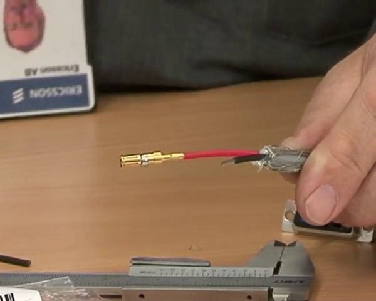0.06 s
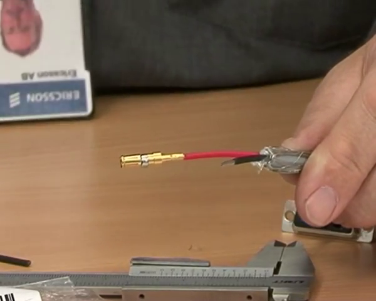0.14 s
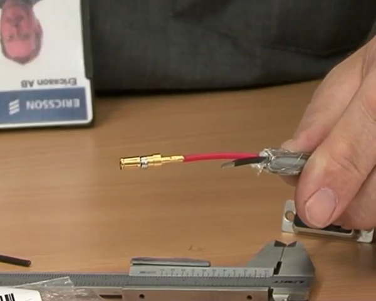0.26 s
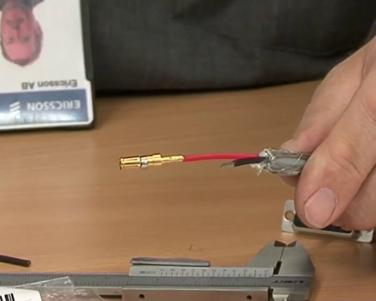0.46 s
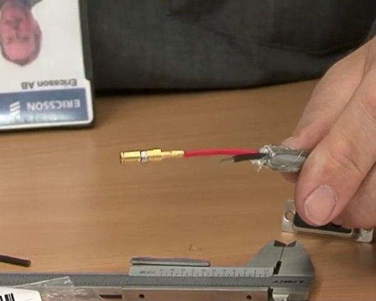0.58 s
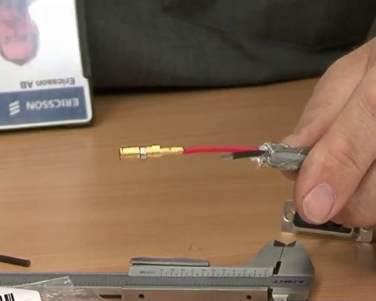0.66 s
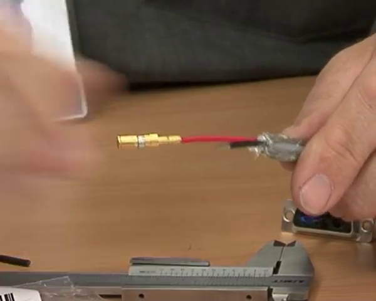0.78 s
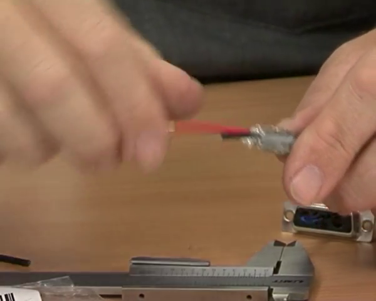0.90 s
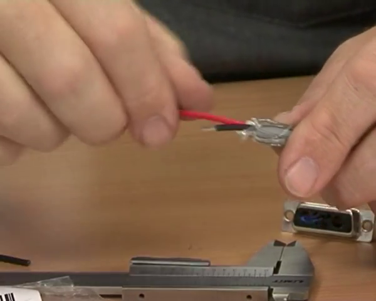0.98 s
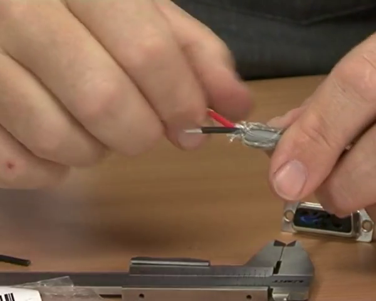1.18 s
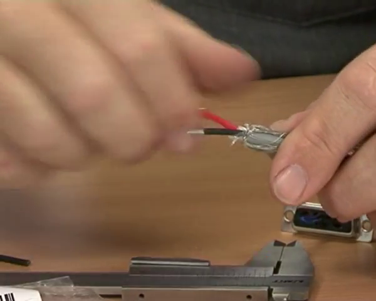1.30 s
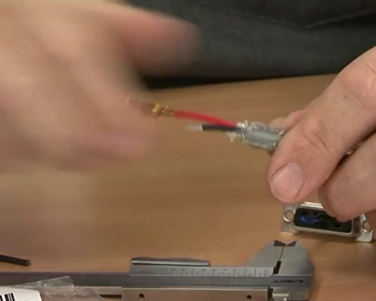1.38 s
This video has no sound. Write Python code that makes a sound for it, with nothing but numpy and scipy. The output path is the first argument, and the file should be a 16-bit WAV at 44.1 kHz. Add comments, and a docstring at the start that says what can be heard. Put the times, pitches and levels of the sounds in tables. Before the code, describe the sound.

Close up in a small room, a metal hand tool thuds and clacks twice onto a wooden work table, which booms as the steel faintly rings. Light ticks and a soft sleeve rub follow over a low hum.

```python
"""A dull thud and two hard clacks: a steel crimping tool is put down on a wooden work table in a small room.
Each landing rings the table top, which booms; the jolted, loose steel jaws rattle and ring faintly.
Then a sleeve slides over the table in tiny slips of cloth as the hand comes back to the wire.
Small handling ticks and a dull shuffle sound over the room's hum."""
import sys
import numpy as np
from scipy import signal
from scipy.fft import rfft, irfft
from scipy.io import wavfile

SR = 44100
rng = np.random.default_rng(int(sys.argv[2]) if len(sys.argv) > 2 else 0)


def wav_out(sig):
    """Save sig, one row per channel (or a flat mono array), as 16-bit PCM at SR to the path in sys.argv[1]."""
    wavfile.write(sys.argv[1], SR, np.round(np.clip(np.atleast_2d(sig).T, -1, 1) * 32767).astype(np.int16))


N = 63945
T = np.arange(N) / SR
AGE = T[:N // 2]  # seconds since a contact

# Each row: start in seconds, top level in dB, contact brightness in Hz, pitch the spot favours in Hz,
# its boost in dB, crack level in dB, sway level in dB, boom level in dB.
LANDINGS = [(0.2386, -4, 680, 481, 16.5, -34.5, -39, -17), (0.28, -1, 3830, 310, 2.5, -19.5, -28.5, -21.5),
            (0.5106, -0.5, 2220, 920, 3.5, -21, -22.5, -18.5)]
SPOT_WIDTH_OCT, CRACK_T60_S, CRACK_LOW_HZ = 0.39, 0.0087, 1460

def knocks():
    """Each landing rings the top, cracks at the contact and makes the whole table sway and boom."""
    sway, boom = ring(hz=55.5, t60=0.44), ring(hz=92, t60=0.23)
    out = 0
    for start, db, bright_hz, spot_hz, spot_db, crack_db, sway_db, boom_db in LANDINGS:
        def spot_gain(hz):
            return from_db(spot_db * np.exp(-(np.log2(hz / spot_hz) / SPOT_WIDTH_OCT) ** 2))
        top = from_db(db) * table_top(bright_hz, spot_gain)
        crack = from_db(crack_db) * cut(burst(CRACK_T60_S), CRACK_LOW_HZ, "high")
        out += place(start, top + crack + from_db(sway_db) * sway - from_db(boom_db) * boom)
    return out


# Each row: frequency in Hz, relative level in dB, T60 in seconds.
TOP_MODES = [(140.5, -16, 0.085), (204.5, -19, 0.091), (249, -22, 0.13), (314.4, -9.5, 0.079),
             (454, -10, 0.044), (600, -10, 0.036), (812.4, -5.5, 0.032), (994, -8.5, 0.015),
             (1217, -11.5, 0.023), (1650, -19, 0.019), (1886, -15.5, 0.025), (2325, -15, 0.017),
             (2685, -18.5, 0.017), (3400, -26.5, 0.0087), (5500, -21, 0.027)]

def table_top(bright_hz, mode_gain):
    """The struck wood rings; a soft contact starts gently and weakens the high modes."""
    modes = 0
    for k, (hz, db, t60) in enumerate(TOP_MODES):
        rolloff = np.hypot(1, (hz / bright_hz) ** 2)
        modes += (-1) ** k * from_db(db) * mode_gain(hz) / rolloff * ring(hz, t60)
    attack = np.tanh(2 * np.pi * bright_hz * AGE)
    return modes * attack


# Each row: start in seconds, level in dB.
HEAD_HITS = [(0.2803, -27), (0.5116, -20.5)]
# Each row: frequency in Hz, relative level in dB, T60 in seconds.
DAMPED_HEAD_MODES = [(1642, 0, 0.039), (4060, -2.5, 0.015), (5630, -4, 0.017), (11400, -7, 0.0088)]

def head_snaps():
    """The steel head, damped by the hand, snaps briefly where it lands hard."""
    head = sum(from_db(db) * ring(hz, t60) for hz, db, t60 in DAMPED_HEAD_MODES)
    return sum(place(start, from_db(db) * head) for start, db in HEAD_HITS)


# Each row: start in seconds, level in dB.
JAW_JOLTS = [(0.2412, -7), (0.2543, -0.5), (0.2912, -5.5), (0.5205, -6), (0.532, -1)]
# Each row: frequency in Hz, relative level in dB, T60 in seconds.
JAW_MODES = [(3009, -44.5, 0.28), (3420, -48, 0.45), (3955, -59, .22), (5346, -47.5, 0.46),
             (6345, -43, 0.22), (6826, -45, 0.28), (6867, -37.5, 0.22), (10235, -45.5, 0.21)]
RATTLE_DB, RATTLE_T60_S, JOLT_RISE_S = -23, 0.11, 0.0045
CHATTER_DEPTH, CHATTER_HZ = 0.55, 60

def jaws():
    """Jolted just after a landing, the loose steel jaws rattle and ring on, wavering."""
    rise = np.clip(AGE / JOLT_RISE_S, 0, 1)
    out = 0
    for start, db in JAW_JOLTS:
        rattle = from_db(RATTLE_DB) * cut(burst(RATTLE_T60_S), [1400, 5000], "band")
        tone = 0
        for hz, mode_db, t60 in JAW_MODES:
            chatter = 1 + CHATTER_DEPTH * waver(CHATTER_HZ, size=len(AGE))
            tone += from_db(mode_db) * ring(hz, t60) * chatter
        out += place(start, from_db(db) * rise * (rattle + tone))
    return out


# Each row: start in seconds, level in dB, contact brightness in Hz, bass roll-off in Hz.
HANDLING_TAPS = [(0.012, -12, 254, 75.6), (0.086, -30, 590, 202), (0.184, -31.5, 1200, 250),
                 (0.2459, -4, 1240, 603), (0.2615, -14, 1320, 152), (0.303, -42, 2500, 200),
                 (0.322, -32, 447, 150), (0.411, -28, 8300, 3500), (0.466, -22.5, 2960, 1000),
                 (0.483, -20.5, 4940, 2020), (0.5055, -10, 282, 59), (0.826, -25.5, 3020, 1410),
                 (0.836, -24.5, 2950, 1530), (0.863, -28, 7000, 3020), (1.345, -22, 2210, 1320),
                 (1.444, -20, 487, 97)]

def taps():
    """Small bumps and ticks on the same top; light touches move little bass."""
    out = 0
    for start, db, bright_hz, low_hz in HANDLING_TAPS:
        top = table_top(bright_hz, lambda hz: 1 / np.hypot(1, (low_hz / hz) ** 2))
        out += place(start, from_db(db) * top)
    return out


# Each row: time in seconds, relative level in dB.
RUB_ENVELOPE = [(0.94, -63), (1.005, -43.5), (1.08, -39.5), (1.125, -42), (1.16, -39.5), (1.19, -42),
                (1.24, -60), (1.339, -76), (1.346, -33.5), (1.357, -47.5), (1.368, -36), (1.41, -39),
                (1.45, -45.5)]
TREBLE_ENVELOPE = [(1.0, -61), (1.042, -61), (1.056, -47), (1.095, -49), (1.15, -59), (1.22, -69),
                   (1.33, -56), (1.39, -48.5), (1.45, -51.5)]
# Each row: frequency in Hz, bandwidth in Hz, relative level in dB.
RUB_RESONANCES = [(445, 35, -8), (760, 57, 2.5), (1243, 87, 5), (1707, 185, 1.5), (2040, 62, -18),
                  (3050, 290, -3.5), (3330, 56, -5)]
# Each row: frequency in Hz, relative density in dB.
TREBLE_SPECTRUM = [(100, -42), (2500, 2), (4300, -0.5), (6000, 2.5), (8000, -3), (10500, -0.5),
                   (12000, -5.5)]
SLIPS_PER_S, SLIP_SPREAD_DB, CATCH_DB, CATCH_HZ = 2300, 2.5, 1.6, 50
BODY_DB, HISS_DB, TREBLE_DB, RUB_TOP_HZ = 0.5, -6, 2, 4020

def sleeve():
    """Cloth catches and lets go unevenly; its tiny slips stir a few resonances, with hiss on top."""
    slips = (rng.random(N) < SLIPS_PER_S / SR) * rng.choice([-1, 1], N)
    slips = slips * from_db(SLIP_SPREAD_DB * np.minimum(rng.exponential(1, N), 4))
    body = sum(from_db(db) * signal.lfilter(*signal.iirpeak(hz, hz / width_hz, SR), slips)
               for hz, width_hz, db in RUB_RESONANCES)
    hiss = cut(slips, [800, 3800], "band")
    rub = from_db(BODY_DB) * rms_one(body) + from_db(HISS_DB) * rms_one(hiss)
    rub = cut(cut(rub, RUB_TOP_HZ, "low"), RUB_TOP_HZ, "low")
    catch = from_db(CATCH_DB * waver(CATCH_HZ))
    treble = from_db(TREBLE_DB) * envelope(TREBLE_ENVELOPE) * noise(TREBLE_SPECTRUM)
    return envelope(RUB_ENVELOPE) * rub * catch + treble


# Each row: time in seconds, level in dB.
SHUFFLE_ENVELOPE = [(0, -47.5), (.12, -42.5), (.22, -35.5), (.3, -35.5), (.45, -42.5), (.55, -56)]
# Each row: frequency in Hz, relative density in dB.
SHUFFLE_SPECTRUM = [(50, -17), (150, -4.5), (280, -13), (430, -1), (650, -21), (1300, -24.5), (3000, -47),
                    (10000, -54)]

def shuffle():
    """The tool shifts dully in the hand."""
    return envelope(SHUFFLE_ENVELOPE) * noise(SHUFFLE_SPECTRUM)


# Each row: frequency in Hz, level against the direct sound in dB, T60 in seconds.
ECHO_BANDS = [(60, -13.5, 0.27), (162, -4, 0.48), (370, -3.5, 0.29), (840, -9, 0.42), (1640, -0.5, 0.22),
              (3160, -4, 0.29), (6300, -8, .28), (10800, -11, 0.26)]
ECHO_DELAY_S, ECHO_BUILD_S = 0.0027, 0.0041

def room_echo(x):
    """Diffuse echo builds up quickly and dies band by band."""
    hz, db, t60 = np.transpose(ECHO_BANDS)
    edges_hz = np.geomspace(40, 14000, 18)
    white = rng.standard_normal((2, len(AGE)))
    build = np.clip((AGE - ECHO_DELAY_S) / ECHO_BUILD_S, 0, 1)
    response = 0
    for k, (low, high) in enumerate(zip(edges_hz, edges_hz[1:])):
        log_centre = np.log(low * high) / 2
        band_db, band_t60 = (np.interp(log_centre, np.log(hz), column) for column in (db, t60))
        tail = cut(white[k % 2], [low, high], "band") * build * decay(band_t60)
        unity_gain = np.sqrt(2 * (high - low) / SR / len(AGE))
        response += from_db(band_db) * rms_one(tail) * unity_gain
    return signal.fftconvolve(x, response)[:N]


# Each row: frequency in Hz, relative density in dB.
HUM_SPECTRUM = [(15, -43), (25, -9), (187, -0.5), (584, -8), (665, -14), (737, -9), (817, -10), (1600, -13),
                (2020, -19), (2480, -23.5), (6290, -31.5), (8360, -31), (12000, -33.5), (15600, -62),
                (22000, -120)]
HUM_DB = -43

def room_hum():
    """Steady low hum with faint hiss."""
    return from_db(HUM_DB) * noise(HUM_SPECTRUM)


def from_db(db):
    """Decibels to gain."""
    return 10 ** (np.asarray(db) / 20)


def rms_one(x):
    """Scale to unit RMS."""
    return x / np.sqrt(np.mean(x ** 2) + 1e-20)


def envelope(rows):
    """Gain from (seconds, dB) rows; fades in over the 37 ms before the first."""
    times, db = np.transpose(rows)
    return from_db(np.interp(T, times, db)) * np.clip(1 + (T - times[0]) / 0.037, 0, 1)


def noise(spectrum):
    """Unit-RMS noise shaped by (Hz, dB) rows."""
    hz, db = np.transpose(spectrum)
    bins_hz = np.maximum(np.arange(N // 2 + 1) * SR / N, 1)
    gain = from_db(np.interp(np.log(bins_hz), np.log(hz), db))
    return rms_one(irfft(rfft(rng.standard_normal(N)) * gain, N))


def cut(x, hz, kind):
    """Second-order high-, low- or band-pass."""
    sos = signal.butter(2, np.clip(hz, 10, .45 * SR), kind, fs=SR, output="sos")
    return signal.sosfilt(sos, x + 1e-18)


def decay(t60):
    """Envelope falling 60 dB in t60 seconds."""
    return np.exp(np.maximum(-np.log(1000) * AGE / t60, -30))


def ring(hz, t60):
    """One struck mode."""
    t = AGE[AGE < 2 * t60]
    mode = np.exp(-np.log(1000) * t / t60) * np.sin(2 * np.pi * hz * t)
    return np.pad(mode, (0, len(AGE) - len(t)))


def burst(t60):
    """Decaying white noise."""
    return rng.standard_normal(len(AGE)) * decay(t60)


def waver(hz, size=N):
    """Smooth random wobble, unit RMS."""
    return rms_one(cut(rng.standard_normal(size), hz, "low"))


def place(start, x):
    """Delay a sound to its start in seconds."""
    return np.pad(x, (max(int(start * SR), 0), N))[:N]


LOW_CUT_HZ, JAW_ECHO_DB = 33, -1.5

def scene():
    """Impacts and jaws with their echo, plus sleeve, shuffle and hum; mono."""
    impacts = cut(knocks() + head_snaps() + taps(), LOW_CUT_HZ, "high")
    metal = jaws()
    background = shuffle() + room_hum()
    echo = room_echo(impacts + from_db(JAW_ECHO_DB) * metal)
    return (impacts + metal + echo + sleeve() + background)[None]


CLIP_LEVEL, CUTOFF_HZ = 1.04, 11750

def record(dry):
    """Soft clip, then a steep low-pass."""
    rounded = CLIP_LEVEL * np.tanh(dry / CLIP_LEVEL)
    return signal.sosfilt(signal.ellip(10, .2, 70, CUTOFF_HZ, fs=SR, output="sos"), rounded)


dry = scene()
out = record(dry)
wav_out(out)
```